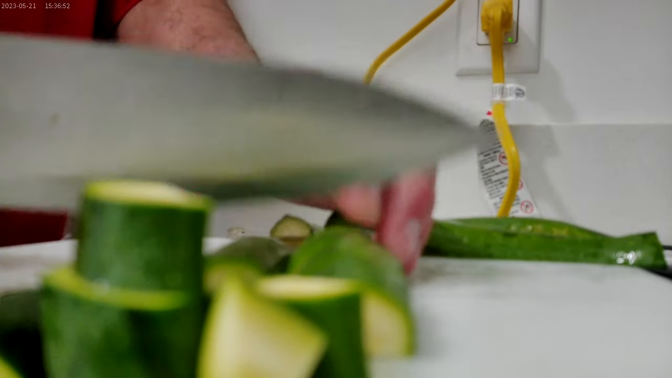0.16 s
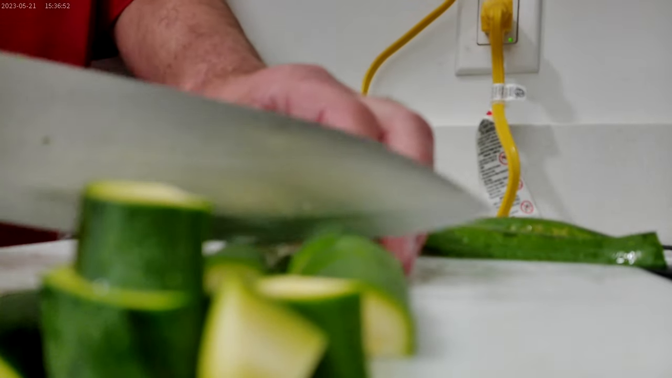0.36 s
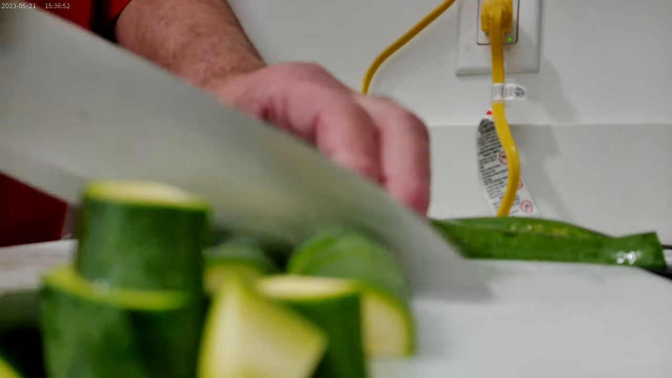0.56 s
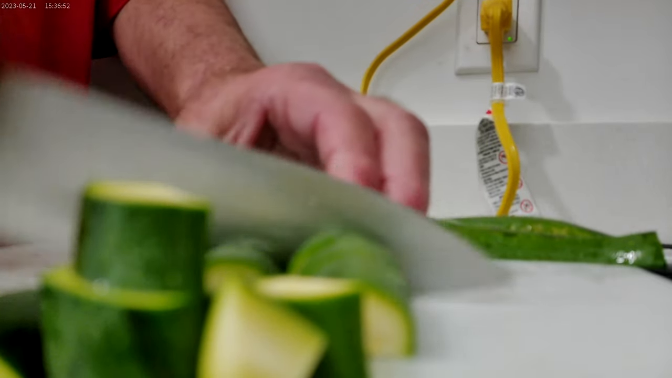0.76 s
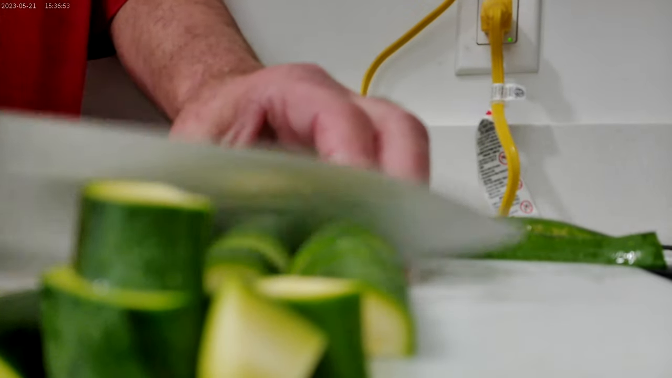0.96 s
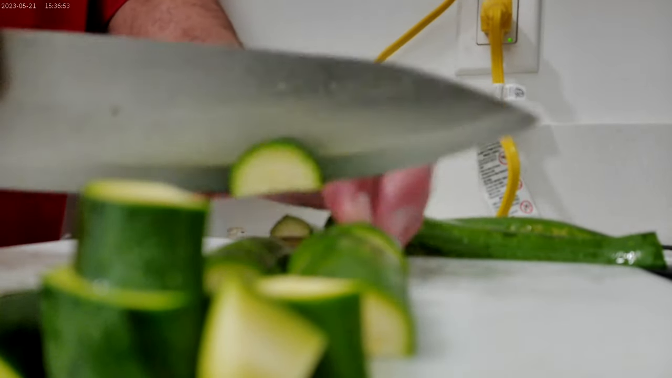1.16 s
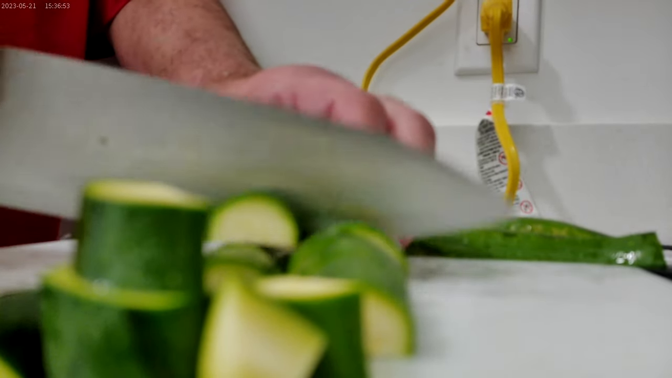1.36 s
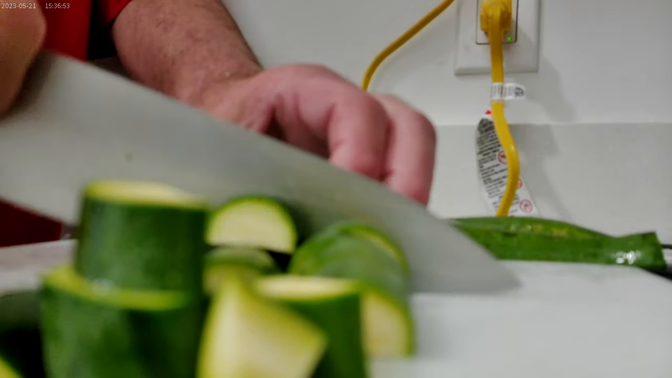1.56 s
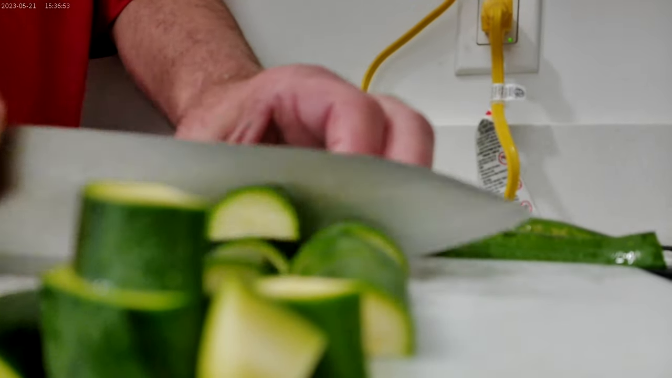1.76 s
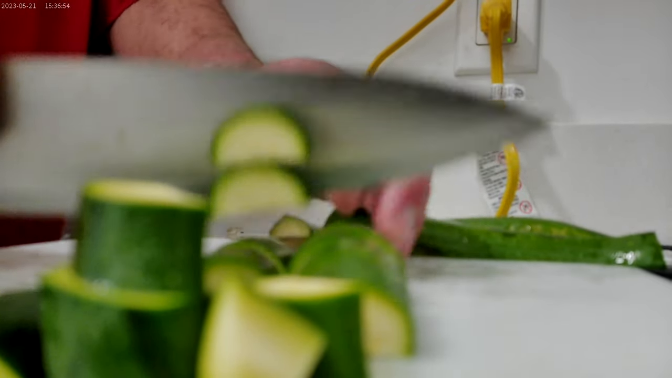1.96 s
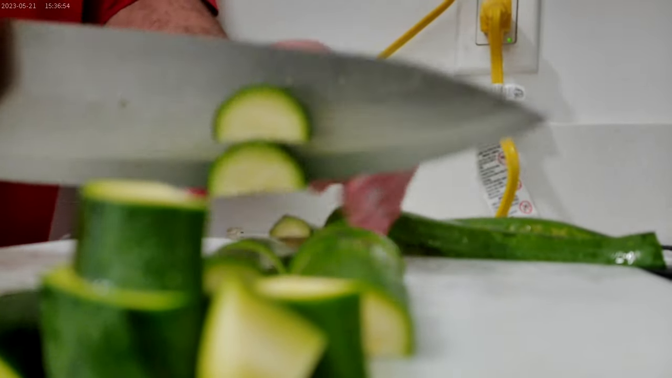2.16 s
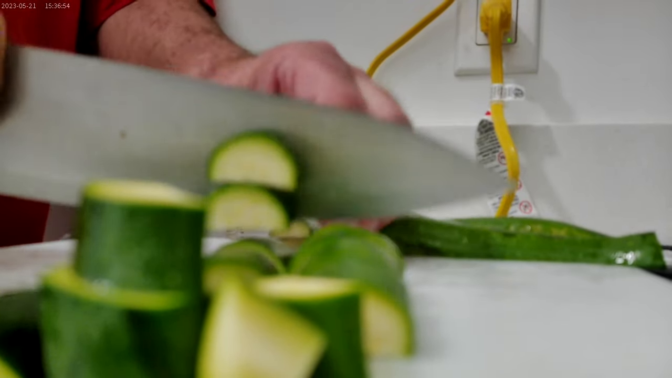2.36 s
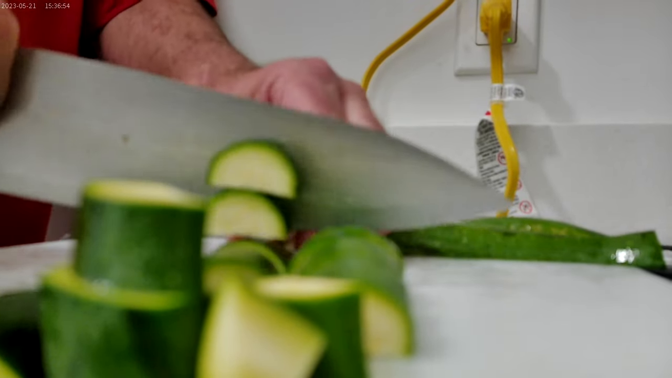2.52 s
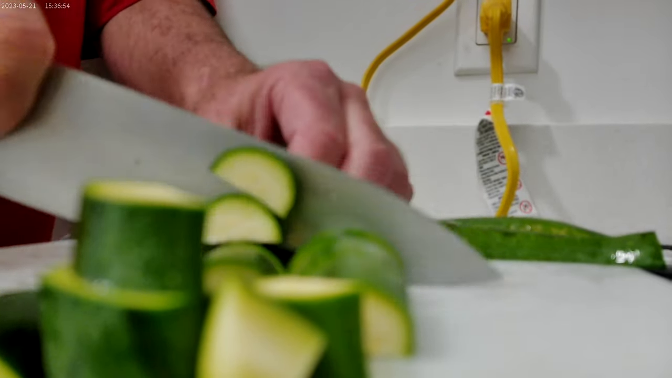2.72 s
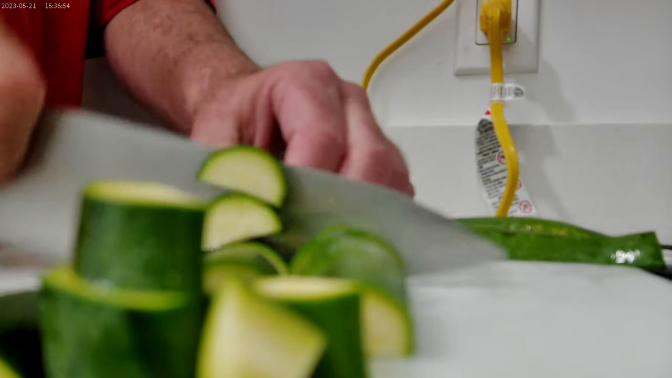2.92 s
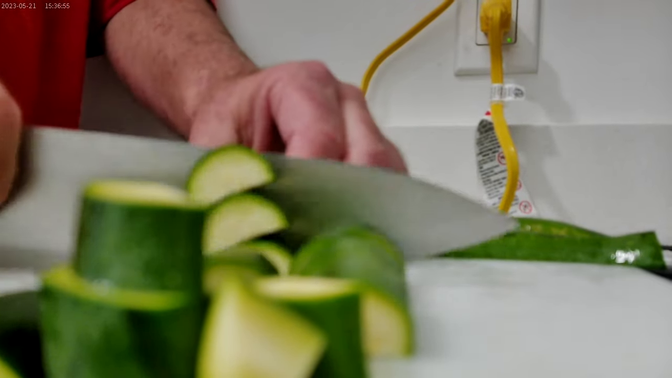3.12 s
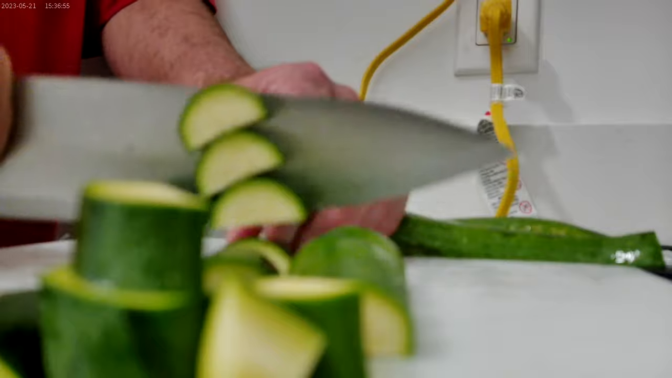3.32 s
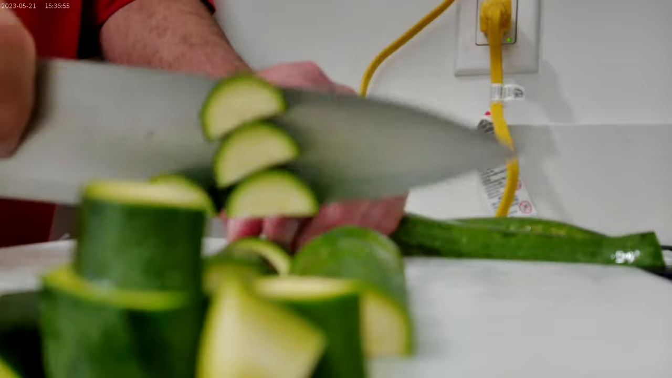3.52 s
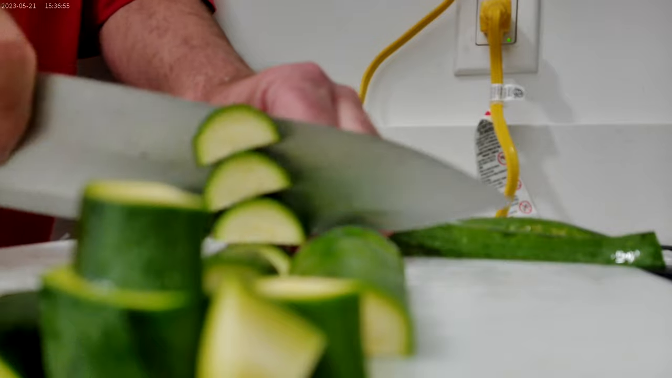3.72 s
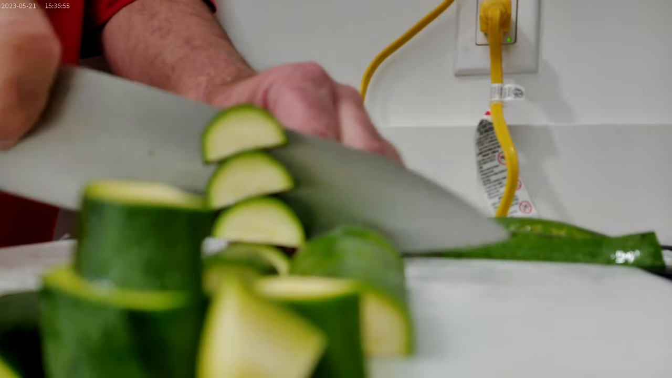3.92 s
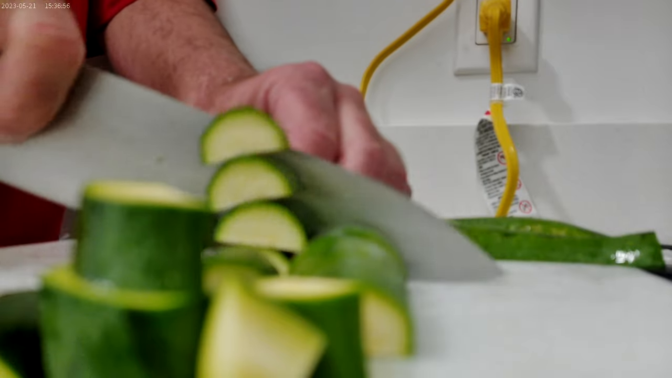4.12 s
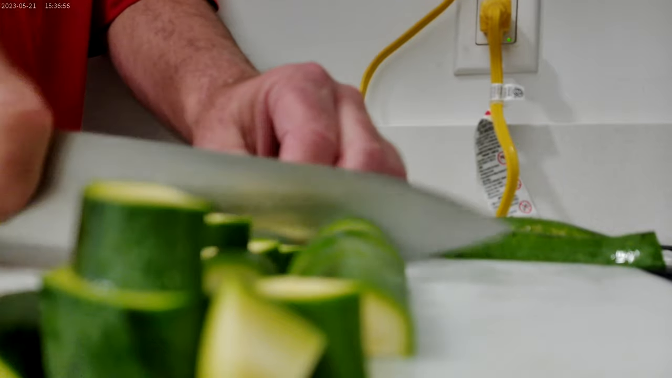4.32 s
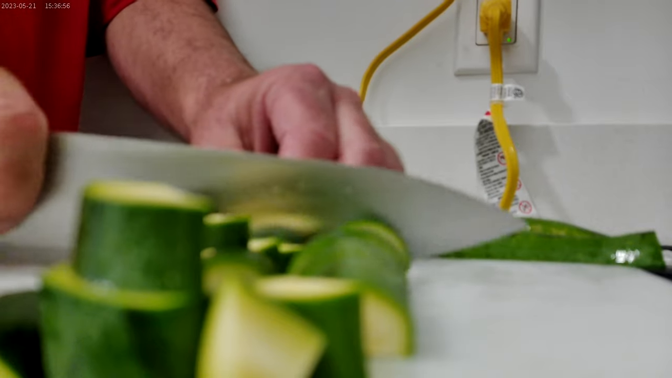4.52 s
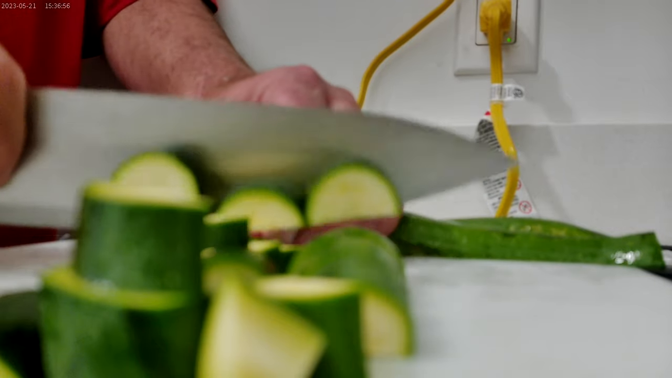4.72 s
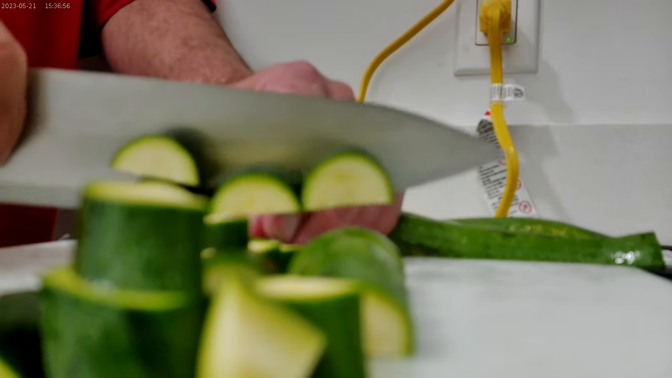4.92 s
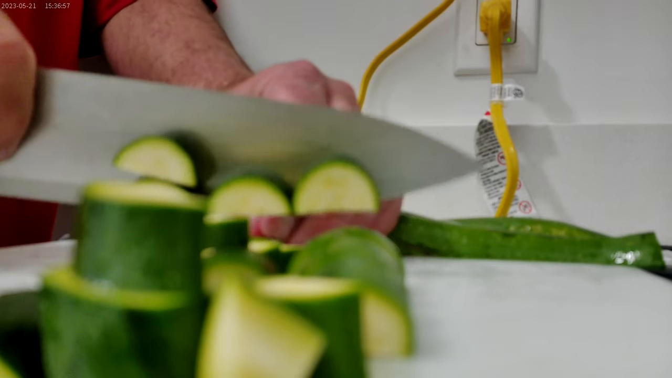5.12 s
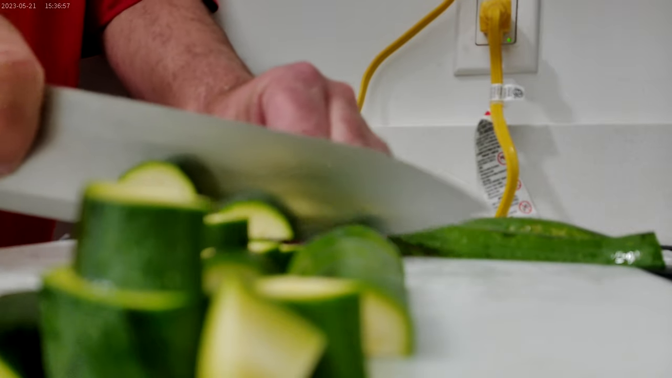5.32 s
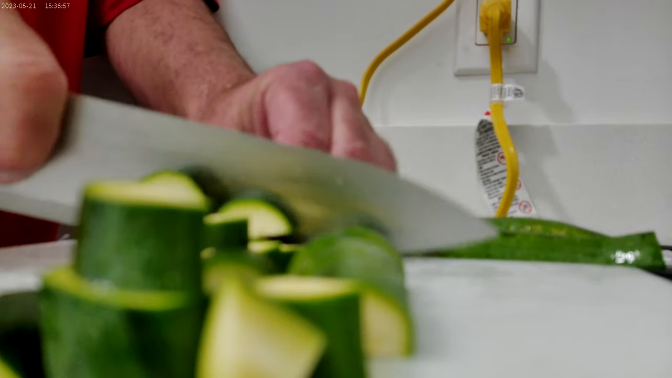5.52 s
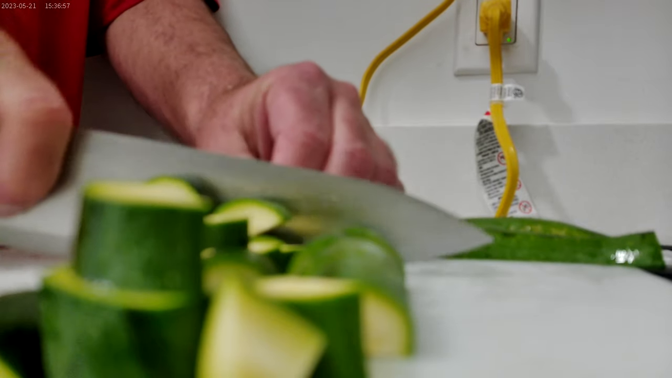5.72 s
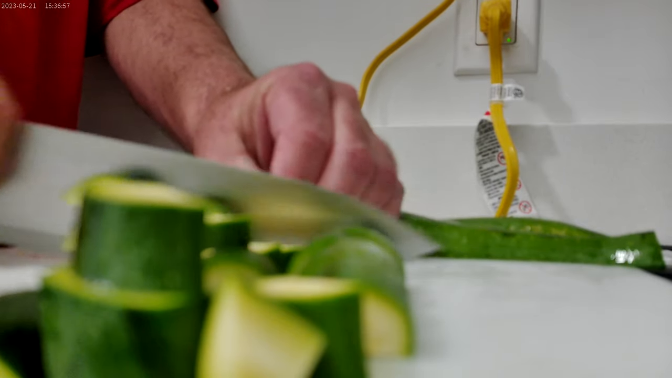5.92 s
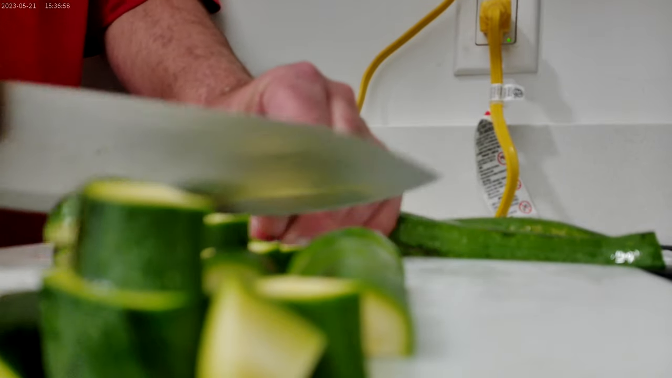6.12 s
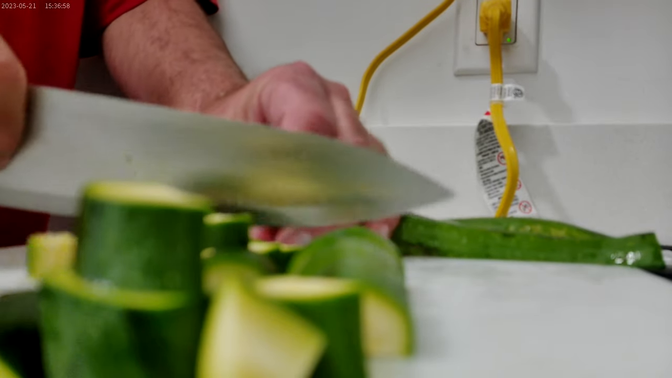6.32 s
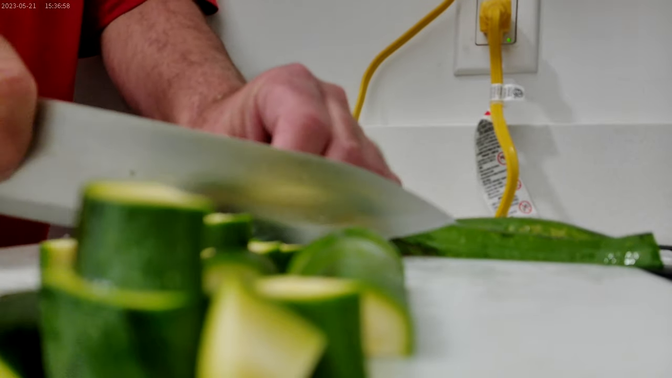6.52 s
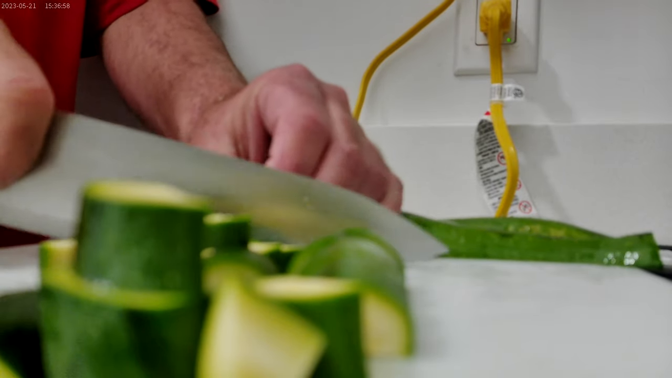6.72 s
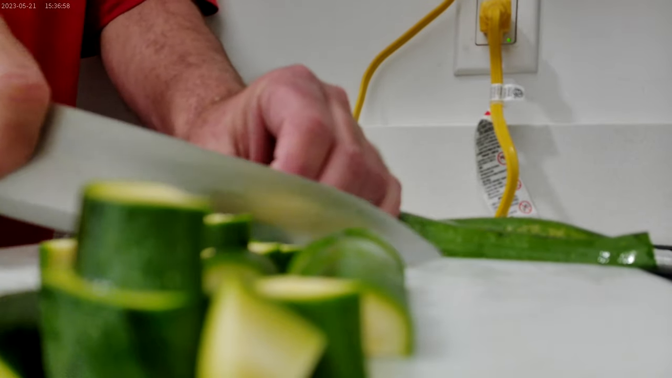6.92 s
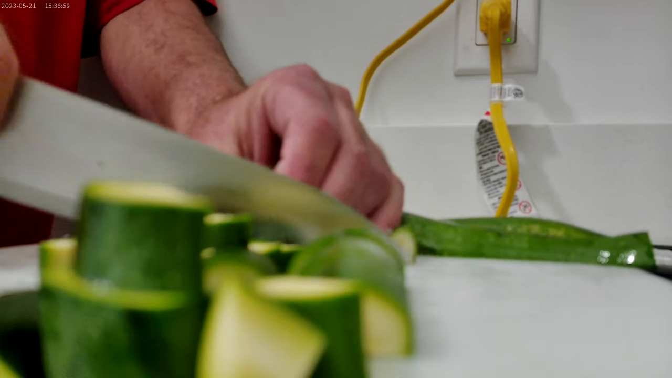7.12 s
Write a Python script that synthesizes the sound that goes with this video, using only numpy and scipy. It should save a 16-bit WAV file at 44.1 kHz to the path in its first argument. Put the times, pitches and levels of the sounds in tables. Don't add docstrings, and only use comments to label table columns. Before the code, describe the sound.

Very close to a small microphone, a big knife slices zucchini on a plastic board. Faint rubbing bites swell into a quick crunchy push, then a hard, hollow slam that distorts, with a tiny heel bounce. The blade scrapes back briefly and wet slices drop with dull taps. This repeats six times, roughly every second, in a quiet small kitchen with a short tiled echo and faint fridge hum.

```python
import sys
import numpy as np
from scipy import signal
from scipy.fft import rfft, irfft
from scipy.io import wavfile
from scipy.ndimage import uniform_filter1d

SR = 44100
rng = np.random.default_rng(int(sys.argv[2]) if len(sys.argv) > 2 else 0)


def undo_db(level):
    steps = np.asarray(level, float) / 20
    return 10 ** steps


def unload_audio(sound):
    columns = np.transpose(np.atleast_2d(sound))
    steps = np.round(np.clip(columns, -1, 1) * 32767)
    wavfile.write(sys.argv[1], SR, steps.astype(np.int16))


N = 316197
STEP = 32

# f/Hz, level/dB, t60/s
BOARD_MODES = [(311.7, -4, 0.045), (403, -4, 0.037), (462, 0.5, 0.027), (577, -0.5, .03),
               (685.4, 0.27, 0.032), (788, -4.5, .035), (856.5, -3.5, .035), (980, -5, .03),
               (1156, -9, 0.01), (1362, -16, 0.028), (1590, -7, 0.01), (1713, -12.5, 0.032),
               (2444, -23, 0.0075), (3156, -29.5, 0.029), (3631, -31, 0.0083)]
# f/Hz, level/dB, t60/s
BLADE_MODES = [(5560, -42, .065), (5660, -46, .05)]


def blow(spot, bend_db):
    t = np.arange(8000) / SR
    sound = np.zeros(8000)
    for k, (hz, db, t60) in enumerate(BOARD_MODES):
        level_db = db + 2.3 * spot[k] + bend_db * (hz < 350)
        sound += (-1) ** k * undo_db(level_db) * ring(t, hz * (1 + 0.031 * spot[-1 - k]), t60)
    sound += 0.39 * np.diff(spot, prepend=0) * np.exp(-t / .0015)
    rattle = resonances(spot, [(557, 380, 0.15), (1110, 790, -9.5)])
    sound += 0.55 * rattle * np.exp(-t / 0.0044)
    for hz, db, t60 in BLADE_MODES:
        sound += undo_db(db) * ring(t, hz, t60)
    return sound * (1 - np.exp(-t / .0005))


# t/s, level/dB, board bending/dB, heel bounce delay/ms, bounce level/dB
CHOPS = [
    (0.789, 7.5, -2, 7.7, -14.5),
    (1.698, 13, 3.5, 9.1, -15.5),
    (2.931, 8.5, -0.8, 9.1, -12.5),
    (4.218, 2, -0.2, 8.3, -11),
    (5.782, 10, 2.5, 7.5, -19),
    (6.93, 8.5, 1.1, 9.1, -12),
]


def slams():
    mix = np.zeros(N)
    for s, peak_db, bend_db, bounce_ms, bounce_db in CHOPS:
        hit = blow(rng.standard_normal(8000), bend_db)
        bounce = blow(rng.standard_normal(8000), bend_db)
        add(hit, bounce_ms / 1000, undo_db(bounce_db) * bounce)
        add(mix, s - .0005, undo_db(peak_db) * hit / abs(hit).max())
    return no_bass(mix)


# f/Hz, width/Hz, level/dB
RUB_MID = [(570, 69, -9), (730, 79, 3), (820, 80, 1), (882, 140, -8), (1075, 97, -16.5)]
# f/Hz, width/Hz, level/dB
RUB_TIP = [(1380, 150, -3), (1680, 130, 5), (1940, 220, -9.5)]
# f/Hz, width/Hz, level/dB
RUB_BEND = [(290, 39, 0.76), (432, 150, -8)]
# f/Hz, width/Hz, level/dB
RUB_HIGH = [(2260, 220, 4), (2950, 380, 4), (3840, 450, 3.8), (4700, 420, -4)]
# f/Hz, width/Hz, level/dB
RUB_EDGE = [(5250, 400, -2.5), (5750, 405.7, 0.33), (6400, 450, -8)]


def rubbing(gains):
    sizes = undo_db(2.2 * np.minimum(rng.exponential(1, N), 4))
    grains = rng.standard_normal(N) * sizes * (rng.random(N) < 9000 / SR)
    slips = grains * undo_db(2.2 * evened(smoothed_noise(300)))
    bodies = (RUB_MID, RUB_TIP, RUB_BEND, RUB_HIGH, RUB_EDGE)
    return sum(gain * resonances(slips, modes) for gain, modes in zip(gains, bodies))


# tip contact/dB, board bending/dB, steel on plastic/dB
BITE_MIX, PUSH_MIX, DRAG_MIX = (-1, -7, -22), (-1, -1.5, -16), (-5, -16, -12)
BEND_SHARE, HISS_SHARE = .75, 1.2
TIP_SHARE = .6


def stroke(shape_db, press_db, hiss_db, mix):
    tip_db, bend_db, steel_db = mix
    tip = TIP_SHARE * hiss_db + (1 - TIP_SHARE) * press_db + tip_db + shape_db
    hiss = hiss_db + HISS_SHARE * shape_db
    bend = press_db + bend_db + np.minimum(BEND_SHARE * shape_db, shape_db + 25)
    return undo_db([press_db + shape_db, tip, bend, hiss, hiss + steel_db])


# t/s, time to ease 30 dB/s, pressure level/dB, edge hiss level/dB
BITES = [(0.005, 0.1, -52, -85), (0.046, 0.06, -53, -74), (0.127, .06, -54.5, -78),
         (0.455, 0.1, -79.5, -110), (0.553, 0.08, -45, -77), (0.72, .4, -56.5, -76.5),
         (1.048, .045, -37, -66), (1.44, 0.3, -69.5, -110), (1.54, .13, -52, -79), (1.655, 0.4, -49.5, -63),
         (2.766, 0.37, -43.5, -67), (2.832, 1.2, -45, -70), (3.168, .13, -39, -63),
         (4.036, .075, -36.5, -61), (4.09, .9, -55, -77), (4.138, 0.35, -39.5, -69), (4.778, .5, -75, -110),
         (5.485, 0.5, -66, -110), (5.526, 0.1, -50.5, -100), (5.742, .2, -38.5, -70),
         (6.176, 0.17, -56, -78), (6.326, 0.4, -71.5, -110), (6.438, .075, -49.5, -100),
         (6.52, .16, -55.5, -100), (6.864, 0.6, -48.5, -81)]


def bites():
    power = 0
    for s, fall, db, hiss_db in BITES:
        slam = min(row[0] for row in CHOPS if row[0] > s)
        gains = stroke(easing(s, .012, fall), db, hiss_db, BITE_MIX)
        power = power + gains ** 2 * (clock() < slam)
    return power


# t/s, time to swell 30 dB/s, pressure/dB, edge hiss/dB, skid hiss/dB
PUSHES = [
    (0.778, 0.0961, -43, -55.5, -62),
    (1.688, 0.1224, -40, -50.5, -56),
    (2.92, .08, -42.5, -60, -71),
    (4.207, .06, -35, -53, -72),
    (5.77, 0.056, -29, -51, -56),
    (6.921, 0.0619, -38.5, -51, -66),
]
PUSH_STOP_S, SKID_AFTER_S, SKID_S = .02, .03, .3


def pushes():
    power = 0
    for s, rise, db, hiss_db, skid_db in PUSHES:
        push = swell(s, rise, PUSH_STOP_S)
        skid = swell(s + SKID_AFTER_S, PUSH_STOP_S, SKID_S)
        power = power + stroke(push, db, hiss_db, PUSH_MIX) ** 2
        power = power + stroke(skid, skid_db, skid_db, DRAG_MIX) ** 2
    return power


# start t/s, length/s, end pressure/dB, growth/dB, edge hiss/dB
DRAGS = [
    (0.85, 0.14, -33.5, 3, -52),
    (1.769, .12, -33.5, 3, -52.5),
    (3.068, .075, -35.5, 7, -57),
    (4.398, .088, -27.5, 6, -49.5),
    (6.05, .11, -55, 2, -70),
]
DRAG_RISE_S, DRAG_LIFT_S = .025, 0.064
SPEED_DB = 8.5


def drags():
    power = 0
    for s, length, db, growth_db, hiss_db in DRAGS:
        to_go = np.clip(1 - (clock() - s) / length, 0, 1)
        shape_db = swell(s, DRAG_RISE_S, DRAG_LIFT_S, length) - growth_db * to_go
        power = power + stroke(shape_db, db, hiss_db - SPEED_DB * to_go, DRAG_MIX) ** 2
    return power


def strokes():
    return [stretched(gain) for gain in np.sqrt(bites() + pushes() + drags())]


def tap(hz, crack_db, t60, bend_db):
    t, chance = np.arange(4000) / SR, rng.standard_normal(4000)
    body = ring(t, hz, t60) + 0.85 * ring(t, .8 * hz, t60)
    body += undo_db(bend_db) * ring(t, BOARD_MODES[0][0], 1.5 * t60)
    body *= np.exp(-(t / (0.87 * t60)) ** 2)
    dull = signal.sosfilt(signal.butter(4, 1900, fs=SR, output="sos"), chance)
    thud_modes = [(hz, 350, 0.1), (1.4 * hz, 400, -9), (1650, 350, crack_db / 2 + 11)]
    thud = 0.3 * resonances(dull, thud_modes) * undo_db(-60 * t / (.8 * t60))
    crack = resonances(chance, [(2602, 2100, 0)]) * np.exp(-t / .0035) * (1 - np.exp(-t / .001))
    return (body + thud) * (1 - np.exp(-(t / 0.003) ** 2)) + undo_db(crack_db + 2) * crack


# t/s, level/dB, f/Hz, crack level/dB, board bending/dB
TICKS = [(0.042, -34.5, 860, -40.5, -9), (0.121, -40, 814, -40, -7.5), (0.549, -43, 717, -37, -6),
         (0.718, -50, 770, -30.5, -3), (0.859, -45, 710, -13, 0.5), (0.882, -26, 790, -45, -25),
         (1.043, -26, 827, -32.5, -29), (1.12, -25, 710, -47, -8), (1.218, -16.5, 822, -52, -30),
         (1.676, -28, 790, -30, -8), (1.922, -9.5, 805, -21, -12.5), (2.782, -24.5, 803, -43, -1),
         (2.832, -36, 785, -31, -17), (2.910, -31, 780, -24, -10), (3.101, -27, 750, -40, -20),
         (3.118, -21, 760, -24, -24), (3.149, -26, 734, -22, -21.5), (4.044, -30, 845, -38, -5.5),
         (3.216, -34, 720, -34, -6), (4.139, -26.5, 820, -39.5, -25)]


def ticks():
    mix = np.zeros(N)
    for s, db, hz, crack_db, bend_db in TICKS:
        t60 = .039 * 2 ** ((db + 20) / -22)
        add(mix, s - .0008, undo_db(db) * tap(hz, crack_db, t60, bend_db))
    return mix


# t/s, level/dB, f/Hz, t60/s, board bending/dB
DROPS = [(1.066, -31, 790, 0.029, -16), (1.432, -46, 608, 0.072, 7.5), (1.563, -47.5, 590, 0.1, 11),
         (1.945, -25.5, 835, 0.038, 0), (2.162, -40.5, 669, 0.037, -2.5), (3.333, -22, 682.5, 0.046, -2.5),
         (3.476, -46.5, 834, 0.05, -20), (4.478, -26, 759, 0.078, -32), (5.524, -24.5, 617, 0.04, -17),
         (6.442, -39, 606, 0.05, -10.5), (6.523, -43, 706, 0.054, -8), (6.862, -36, 855, 0.051, -20.5),
         (7.106, -21.5, 794, 0.042, -19.5)]


def drops():
    mix = np.zeros(N)
    for s, db, hz, t60, bend_db in DROPS:
        add(mix, s - .0008, undo_db(db) * tap(hz, -58, t60, bend_db))
    return mix


# f/Hz, t60/s
KITCHEN_T60 = [(100, 0.1), (300, .22), (700, 0.39), (1400, 0.3), (2200, 0.26), (3200, 0.12), (5000, .085)]
# f/Hz, level/dB
KITCHEN_COLOUR = [(100, -15.5), (300, -7.5), (480, -2), (750, -5), (1300, -2), (2200, -11.5), (4000, -15),
                  (7000, -29)]


def kitchen(x):
    taps = np.zeros(SR // 2)
    at = np.arange(500, SR // 2 - 20, 20)
    taps[at + rng.integers(0, 20, len(at))] = rng.choice([-1., 1.], len(at))
    hz, t, z = signal.stft(taps, SR, nperseg=256)
    decay_db = 60 * t / read(KITCHEN_T60, hz)[:, None]
    z = z * undo_db(read(KITCHEN_COLOUR, hz)[:, None] - decay_db)
    tail = signal.istft(z, SR, nperseg=256)[1]
    x = x * (0.7 + 0.7 * evened(smoothed_noise(40)))
    return signal.fftconvolve(x, tail / np.linalg.norm(tail))[:N]


# t/s, level/dB, time to ease 30 dB/s
BUMPS = [(0.05, -40.5, 0.12), (0.454, -50, .4), (0.586, -55, 0.24), (0.81, -31, 0.07), (1.056, -41.5, 0.15),
         (1.44, -46, 0.2), (1.592, -50.5, 0.16), (1.72, -27, .06), (1.936, -34, .1), (2.776, -52, .5),
         (2.95, -34, .06), (3.242, -48, .16), (3.33, -48.5, 0.17), (3.93, -64, 0), (4.054, -54, 0.8),
         (4.24, -39, 0), (4.518, -52, .3), (5.524, -52.5, 0.2), (5.79, -27, .05), (6.426, -58.5, .8),
         (6.95, -40, .14)]
# f/Hz, level/dB per Hz
SHAKE_TONE = [(12, -42.5), (20, -6.5), (81, 5.5), (192, -13), (250, -4), (320, -33.5), (550, -120)]
REST_DB, LEAN_DB = -76, -19


def counter(pressure):
    bumps = stretched(sum(undo_db(db + easing(s, 0.047, fall)) for s, db, fall in BUMPS))
    lean = undo_db(LEAN_DB) * uniform_filter1d(pressure, size=2000)
    return (bumps + lean + undo_db(REST_DB)) * coloured(SHAKE_TONE)


# f/Hz, level/dB per Hz
HUM = [(15, -45), (25, -17.5), (43, -0.5), (61, -7), (76, -6.5), (128, -1.5), (156, -31.5), (237, -19),
       (259, -25.5), (340, -16), (395, -41), (900, -43.5), (1170, -83.5), (1980, -120)]


def fridge():
    return undo_db(-67) * coloured(HUM)


def evened(x):
    return x / np.sqrt(np.mean(x ** 2) + 1e-20)


def smoothed_noise(size):
    return uniform_filter1d(uniform_filter1d(rng.standard_normal(N), size), size)


def read(points, hz):
    f, value = np.transpose(points)
    return np.interp(np.log(hz + 1), np.log(f + 1), value)


def add(mix, s, sound):
    part = mix[max(round(s * SR), 0):][:len(sound)]
    part += sound[:len(part)]


def resonances(x, modes):
    total = 0
    for k, (hz, width, db) in enumerate(modes):
        b, a = signal.iirpeak(hz, hz / (1.5 * width), SR)
        total = total + (-1) ** k * undo_db(db) * signal.lfilter(b, a, signal.lfilter(b, a, x))
    return evened(total)


def coloured(points):
    spectrum = rfft(rng.standard_normal(N)) * undo_db(read(points, np.fft.rfftfreq(N, 1 / SR)))
    return evened(irfft(spectrum, N))


def ring(t, hz, t60):
    return undo_db(-60 * t / t60) * np.sin(2 * np.pi * hz * t)


def no_bass(x):
    return signal.sosfiltfilt(signal.butter(2, 190, "high", fs=SR, output="sos"), x)


def overloaded(x, ceiling):
    return x / (1 + abs(x / ceiling) ** 12) ** (1 / 12)


def swell(s, rise, fall, hold=0):
    t = clock() - s
    return -30 * np.maximum(np.maximum(-t / rise, (t - hold) / fall), 0)


def easing(s, rise, fall):
    return np.maximum(swell(s, rise, fall), -24 + swell(s, rise, .45))


def clock():
    return np.arange(0, N + STEP, STEP) / SR


def stretched(control):
    return np.interp(np.arange(N) / SR, clock(), control)


def scene():
    gains = strokes()
    chops, rubs = slams(), rubbing(gains)
    knocks = ticks() + drops()
    room = kitchen(undo_db(-25.5) * chops + undo_db(-34) * knocks + undo_db(-33) * rubs)
    return (chops + knocks + rubs + room + counter(gains[0]) + fridge())[None]


def roll_off(x):
    return signal.sosfilt(signal.butter(12, 9050, fs=SR, output="sos"), x)


def record(dry):
    excess = overloaded(dry, .68) - dry
    clipped = overloaded(dry + .3 * excess + .7 * no_bass(excess), .69)
    clipped = clipped + undo_db(-97) * rng.standard_normal(N)
    narrow = signal.sosfiltfilt(signal.butter(5, 6700, fs=SR, output="sos"), clipped)
    narrow = signal.sosfiltfilt(signal.butter(16, 8900, fs=SR, output="sos"), narrow)
    finished = narrow + undo_db(-103) * rng.standard_normal(N)
    return roll_off(finished)


dry = scene()
out = record(dry)
unload_audio(out)
```